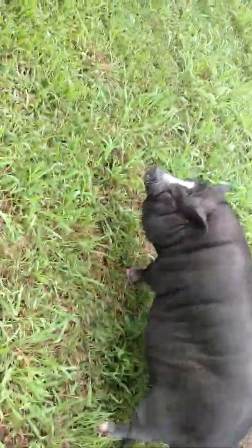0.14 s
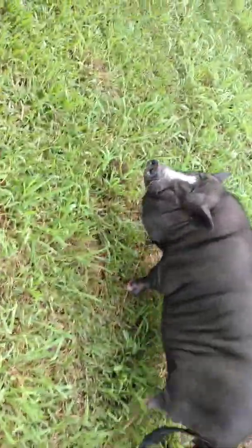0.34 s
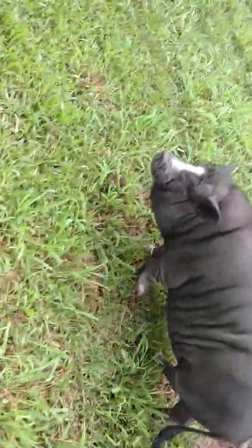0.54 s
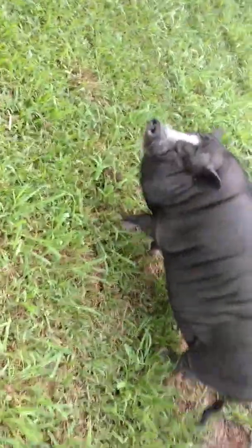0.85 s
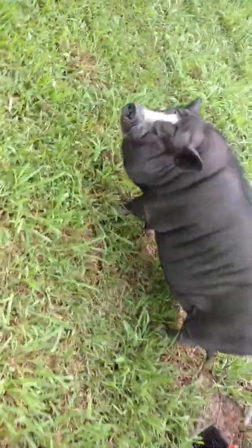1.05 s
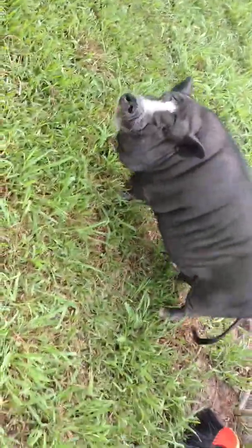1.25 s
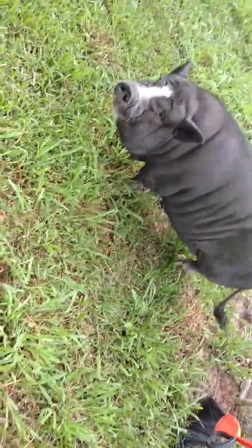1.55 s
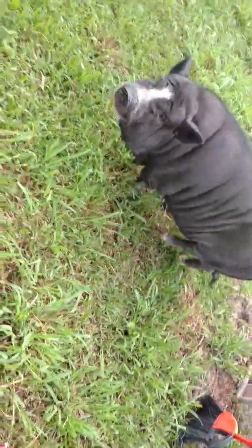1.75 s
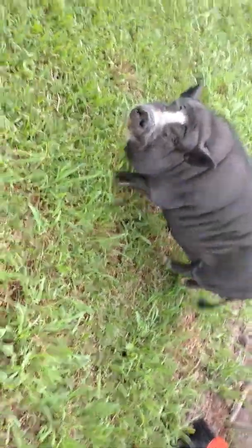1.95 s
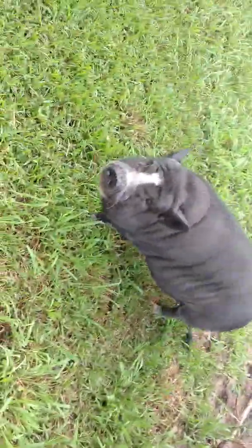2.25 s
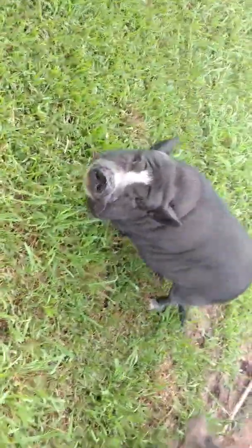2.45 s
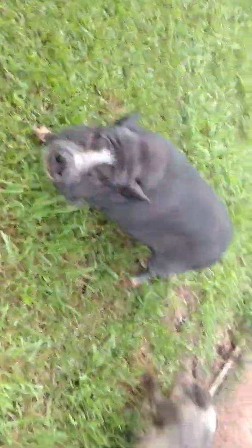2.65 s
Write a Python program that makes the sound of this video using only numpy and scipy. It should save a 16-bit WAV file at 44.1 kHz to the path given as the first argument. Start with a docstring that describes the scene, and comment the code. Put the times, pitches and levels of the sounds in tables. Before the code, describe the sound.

A pig grunts in short, low, throaty bursts on rustling grass, with insects buzzing faintly behind.

```python
"""Pigs grunt in short bursts in a grassy pen, close to a phone with two microphone ports.
Grunts are made of runs of slow vocal pulses that ring the throat and snout. One hoof stamps and settles,
ringing the soft soil. Grass rustles as dense grains of noise and stalks snap as short clicks.
Behind it all is a chorus of insects, made of throbbing bands of noise."""
import sys
import numpy as np
from scipy import signal
from scipy.fft import rfft, irfft
from scipy.io import wavfile
from scipy.ndimage import uniform_filter1d

SR = 44100
rng = np.random.default_rng(int(sys.argv[2]) if len(sys.argv) > 2 else 0)


def dump_mix(stems):
    """Bounce the given channels to the path in sys.argv[1] as a 16-bit WAV at rate SR."""
    frames = np.atleast_2d(stems).T  # one column per channel
    limited = np.clip(frames, -1, 1)  # hard clip at full scale
    pcm = np.round(limited * 32767).astype(np.int16)
    wavfile.write(sys.argv[1], SR, pcm)


def decibels_to_gain(level_db):
    """Convert a level in decibels to a linear amplitude gain (20 dB per decade)."""
    exponent = np.asarray(level_db, float) / 20
    return 10 ** exponent


N = 123479  # length in samples


def evened(x):
    """Scales a sound to an average (rms) level of 1."""
    return x / np.sqrt(np.mean(x ** 2) + 1e-20)


def read(points, hz):
    """Reads a curve of (Hz, value) points, with straight lines over log frequency."""
    f, value = np.transpose(points)
    return np.interp(np.log(hz + 1), np.log(f + 1), value)


def add(mix, s, sound):
    """Adds a two-port sound to the mix from second s on, cut at the end of the mix."""
    part = mix[:, round(s * SR):][:, :sound.shape[1]]
    part += sound[:, :part.shape[1]]


def resonate(x, hz, width):
    """A two-pole resonance of peak gain 1."""
    return signal.lfilter(*signal.iirpeak(min(hz, SR / 2.2), hz / width, SR), x)


def aside(x, pan_db, lag_ms):
    """Sends a low sound to both ports, the left one pan_db louder and lag_ms later."""
    n = np.arange(len(x))
    left = np.interp(n - lag_ms * SR / 1000, n, x)
    return np.array([decibels_to_gain(pan_db / 2) * left, decibels_to_gain(-pan_db / 2) * x])


def ports(x):
    """Two views of a diffuse sound made from two unrelated draws, alike by frequency."""
    # Each row: frequency in Hz, likeness of the two ports from 0 to 1.
    likeness = [(60, 0.19), (250, 0.26), (700, 0.81), (1600, 1), (2350, 1), (3400, 1), (4750, 0.98),
                (6000, 0.3), (8500, 0.17), (11000, 0.04), (15000, 0.1)]
    a, b = rfft(x)
    same = np.clip(read(likeness, np.fft.rfftfreq(N, 1 / SR)), 0, 1)
    left = same * a + np.sqrt(1 - same ** 2) * b
    return irfft([left, a], N)


def pigs():
    """All the grunts; each row is a run of pulses, or one pulse, and some grunts take two rows."""
    # Each row: throat shape, first pulse in seconds, length in seconds, pulses per second,
    # place of the strongest pulse from 0 to 1, effort of the first and of the last pulse in dB,
    # roughness from 0 to 1, level of the flap in dB, extra bite of the hardest pulse in dB,
    # level of the loudest 20 ms in dB (before panning), brightness in dB per octave,
    # chest level left over right in dB, chest lag of the left port in ms.
    grunts = [ ("open", .1545, .11, 37.9, .5, -4, -6, .06, -2, 3, -34.5, 5.9, 2, 0),
              ("open", .2865, .004, 38, .1, 0, 0, .1, -2, 0, -37, 7, 2, 0),
              ("open", .4805, .118, 53, .38, -7, -4, .17, -13, 1, -26, 0, 0, -0.21),
              ("deep", .6065, .135, 73, .1, -3, -11, .16, -12, 2.7, -27, 0, -5, 0.91),
              ("tight", 1.4945, .03, 84, .8, -3, -1, .12, -8, 7, -31, 0, -8, 0.055),
              ("tight", 1.531, .04, 172, .35, 0, -10, .12, -20, 0, -24, 0, -11, -0.54),
              ("wide", 1.9005, .088, 99, .55, -7, -12, .15, -10, 2.2, -24, 0, -2.9, 0.23),
              ("nasal", 2.0615, .004, 90, .3, 0, 0, .2, -12, 0, -35, 0, -4, .2),
              ("nasal", 2.0945, .068, 98, .53, -4, -18, .13, -10, 11, -26, 1.3, -2.2, 0.49),
              ("narrow", 2.2265, .004, 90, .1, 0, 0, .12, -16, 0, -34, 1, -1, 0.48),
              ("closed", 2.288, .075, 88, .4, -4, -4, .2, -8, 0, -40, 0, 0, 0),
              ("closed", 2.3685, .075, 86, .31, -6, -6, .1, -8, 6.6, -35.5, 0, 0, 0),
              ("narrow", 2.4565, .065, 97, .58, -7, -13, .1, -14, 1.7, -28.5, 0, -4, 0),
              ("nasal", 2.6195, .046, 93, .4, -5, -2, .12, -11, 10, -24, -1.5, -3.5, 0),
              ("nasal", 2.788, .012, 91, .9, -5, 0, .25, -8, 0, -37, -9, -1.9, 0)]
    out = np.zeros((2, N))
    for row in grunts:
        add(out, *grunt(*row))
    return out


def grunt(throat, start, length, rate, top, first_db, last_db, rough, flap_db, bite_db,
          db, tilt_db, pan_db, lag_ms):
    """Jittered pulses, each with a second flap and a puff of air, ring the throat."""
    # Each throat shape lists its resonances: frequency in Hz, width in Hz,
    # level in dB (before width scaling, the brightness tilt and the overall level).
    throats = { "open": [(224, 245, 0), (744, 234, 5.5), (1407, 216, -2), (1730, 190, -4.5),
               (3550, 260, -22)], "deep": [(202, 130, 5), (654, 210, -2.5), (1410, 220, -16),
               (1937, 230, 7.5), (2630, 210, -6), (3470, 200, -13.5), (5800, 360, -6.5)],
               "tight": [(170, 150, -2.5), (424, 37, -12.5), (826, 166, 0), (1074, 170, -1.5),
               (1990, 360, 1.5), (3270, 300, -27)], "wide": [(376, 184, -1.5), (176, 110, -1.5),
               (860, 420, -2.5), (1190, 110, -5.5), (1747, 230, 2), (2210, 550, -1.5), (3320, 290, -13.5)],
               "nasal": [(386.5, 140, 8.5), (170, 144, -3), (870, 200, 3), (1170, 290, 1), (1826, 290, -4)],
               "narrow": [(392, 184, -2), (193, 210, -13.5), (1092, 187, 1)], "closed": [(382, 340, 5.5),
               (195, 54, -0.5), (904, 110, -9), (1565, 580, 2), (3400, 550, -26)]}
    jitter, uneven_db = .015, .7  # of pulse times (a share) and of pulse effort
    flap_s, skirt = .0072, 1.7  # delay of the second flap; skirt sets how softly a ring starts
    chest_puff_s, puff_s = .014, .006  # how fast the air puffs die away
    rattle_hz = 33  # the slower the pulses, the more the chest rattles between them
    ring_up_s = .001  # time a ring takes to build
    chest_top_hz = 550
    harder = 2.3  # above the chest effort counts this many times, so hard pulses are brighter

    t, draw = np.arange(0, .25, 1 / SR), rng.standard_normal((40, 2))
    at = np.arange(40) / rate * (1 + jitter * draw[:, 0] / np.sqrt(np.arange(1, 41)))
    rough, air = np.clip(rough, 0, 1), rng.standard_normal(len(t))
    effort_db = np.interp(at / length, [0, np.clip(top, .05, .95), 1], [first_db, 0, last_db])
    effort_db = effort_db + uneven_db * draw[:, 1]
    hardest = np.arange(len(at)) == np.argmin(abs(at - top * length))
    sounding = at <= length
    parts = []
    for chest, push_db in ((True, effort_db), (False, harder * effort_db + bite_db * hardest)):
        clicks = np.zeros(len(t))
        clicks[np.round(at[sounding] * SR).astype(int)] = decibels_to_gain(push_db[sounding])
        clicks += decibels_to_gain(flap_db) * np.roll(clicks, round(flap_s * SR))
        fade = np.exp(-t[:3000] / (chest_puff_s if chest else puff_s))
        puffs = signal.oaconvolve(clicks, fade)[:len(t)] * air
        share = np.clip(rough + chest * (rattle_hz / rate) ** 2, 0, 1)  # air against clean clicks
        drive = np.sqrt(1 - share) * evened(clicks) + np.sqrt(share) * evened(puffs)
        part = 0
        for k, (f, w, level_db) in enumerate(throats[throat]):
            if (f < chest_top_hz) != chest:
                continue
            ring = resonate(drive * waver(len(t)), f, w)
            ring = resonate(resonate(ring, f, skirt * w), f, skirt * w)
            gain = decibels_to_gain(level_db + tilt_db * np.log2(f / 400)) / np.sqrt(w)
            part = part + (-1) ** k * gain * ring  # signs alternate down the list
        parts.append(part)
    chest_part, upper_part = parts
    loudest = np.sqrt(uniform_filter1d((chest_part + upper_part) ** 2, 900).max())
    sound = decibels_to_gain(db) / loudest * (aside(chest_part, pan_db, lag_ms) + upper_part)
    return start - ring_up_s, sound


def waver(size):
    """A gain that wanders from one pulse to the next, as soft tissue shifts."""
    wander = uniform_filter1d(uniform_filter1d(rng.standard_normal(size), 400), 400)
    return decibels_to_gain(1.4 * evened(wander))  # 1.4 dB rms


def stamp():
    """A hoof hits soft soil: short low modes, struck again as it settles."""
    # The hoof and its settling. Each row: start in seconds, peak in dB (before panning).
    hits = [(1.2527, -8.5), (1.282, -22.5), (1.301, -27.5)]
    # Ways the soil rings. Each row: frequency in Hz (before a random shift at each hit),
    # level in dB (before the low cut and the hit's level), time to fall by 60 dB in seconds.
    soil = [(213, 2, 0.051), (312, 4.5, 0.026), (427, 4.5, 0.023), (539, -2.5, 0.034), (615, -9, 0.084),
            (815, -9, 0.046), (3400, -25, 0.027)]
    low_cut_hz, rise_s = 208, 0.001
    pan_db, lag_ms = -9, .8

    out, t = np.zeros((2, N)), np.arange(6000) / SR
    for s, db in hits:
        ring = np.zeros(len(t))
        for f, level_db, t60 in soil:
            tone = np.sin(2 * np.pi * f * rng.uniform(0.91, 1.02) * t)
            ring -= decibels_to_gain(level_db - 60 * t / t60) * tone
        ring = ring * (1 - np.exp(-t / rise_s))
        ring = signal.lfilter(*signal.butter(4, low_cut_hz, "high", fs=SR), ring)
        add(out, s, aside(decibels_to_gain(db) * ring / abs(ring).max(), pan_db, lag_ms))
    return out


def grass():
    """Dense grains of uneven size, coloured three ways, each on its own level."""
    # Each row: time in seconds, level of the dry treble in dB, of the rustle in dB,
    # of the low shuffle in dB; levels glide from row to row.
    moves = [(0.0, -45.5, -47, -45), (0.14, -41.5, -45, -45), (0.23, -45.5, -37, -43),
             (0.39, -48, -54, -54.5), (0.51, -42.5, -45, -45), (0.58, -62, -55, -35),
             (0.61, -64, -46.5, -34), (0.79, -47, -49, -48.5), (0.85, -48, -47, -43.5),
             (0.99, -45, -47, -43.5), (1.04, -52.5, -55.5, -46), (1.19, -46, -48.5, -45.5),
             (1.22, -40, -35, -36), (1.252, -47, -33, -38.5), (1.32, -52, -51, -42), (1.46, -41, -47, -48),
             (1.491, -57, -49, -47.5), (1.53, -37, -33, -32), (1.57, -40, -40, -43),
             (1.82, -46, -48.5, -50), (1.85, -37, -44, -49), (1.91, -42.5, -46.5, -41.5),
             (1.96, -57, -39, -32), (1.99, -41.5, -44.5, -45.5), (2.06, -48.5, -50.5, -45.5),
             (2.17, -44, -46.5, -43.5), (2.36, -53, -51.5, -44.5), (2.43, -38, -44.5, -41.5),
             (2.5, -49, -51.5, -46), (2.6, -42.5, -49, -47), (2.8, -59, -57, -50)]
    # Colour of the low shuffle. Each row: frequency in Hz, relative level in dB.
    shuffle = [(40, -8), (80, 5.5), (200, 4), (450, 2), (900, -2), (1500, -8.5), (2200, -16.5), (4000, -18)]
    # Colour of the rustle. Each row: frequency in Hz, relative level in dB.
    rustle = [(300, 0), (1200, -4.5), (2000, 0), (3500, -1.5), (5500, -3), (8000, -14), (12000, -106)]
    # Colour of the dry treble. Each row: frequency in Hz, relative level in dB.
    dry_treble = [(3000, -21), (6000, 9), (9000, 5), (12000, 4.5), (15500, 1.5)]
    grains_per_s, grain_spread_db = 5000, 0.5

    s, *levels = np.transpose(moves)
    hz, out = np.fft.rfftfreq(N, 1 / SR), 0
    for colour, db in zip((dry_treble, rustle, shuffle), levels):
        size = decibels_to_gain(grain_spread_db * np.minimum(rng.exponential(1, N), 5))
        size = size * (rng.random(N) < grains_per_s / SR)
        # a steady floor of noise plus grains 12 samples long
        grains = (0.21 + uniform_filter1d(size, 12) * 3.8) * rng.standard_normal((2, N))
        coloured = evened(irfft(rfft(grains) * decibels_to_gain(read(colour, hz)), N))
        out = out + decibels_to_gain(np.interp(np.arange(N) / SR, s, db)) * coloured
    return ports(out)


def snaps():
    """Each snapping stalk gives one broad click of about a millisecond."""
    # Each row: start in seconds, peak in dB, centre frequency in Hz.
    stalks = [(.2072, -24, 3600), (.8255, -22, 11500), (.8404, -26, 11000), (.8592, -23, 6000),
              (1.446, -29, 11000), (1.505, -22, 12000), (1.5272, -15, 9000), (1.6268, -22, 5000),
              (2.3277, -27, 11000), (2.4, -22, 7000), (2.5514, -23, 4500)]
    out, t = np.zeros((2, N)), np.arange(400) / SR
    for s, db, hz in stalks:
        burst = np.exp(-t / .0008) * rng.standard_normal(len(t))
        click = resonate(burst, hz, hz / 1.5)  # a low Q of 1.5 keeps it broad
        add(out, s, np.ones((2, 1)) * decibels_to_gain(db) * click / abs(click).max())
    return out


def insects():
    """Bands of fast scraping that throb with the wing beat and swell slowly."""
    # Each row: centre in Hz, width of the first resonance in Hz, level in dB,
    # throbs per second, throb depth from 0 to 1.
    singers = [(8610, 630, -43.5, 60.4, 0.21), (6180, 740, -49, 55, 0.21)]
    out, t = 0, np.arange(N) / SR
    for hz, width, db, rate, depth in singers:
        drift = evened(uniform_filter1d(uniform_filter1d(rng.standard_normal(N), 6000), 6000))
        swell = evened(uniform_filter1d(rng.standard_normal(N), 900))
        throb = 1 + depth * np.cos(2 * np.pi * rate * t + 0.5 * drift)
        throb = throb * decibels_to_gain(1.0 * swell + 0.69 * drift)  # both in dB
        band = resonate(resonate(rng.standard_normal((2, N)), hz, width), hz, 1.7 * width)
        out = out + decibels_to_gain(db) * evened(throb * band)
    return ports(out)


def scene():
    """Sounds add up in the air, so the sources are simply summed."""
    return pigs() + stamp() + grass() + snaps() + insects()


def top_cut(x):
    """Nothing passes above the cut-off."""
    return signal.sosfilt(signal.butter(12, 15910, fs=SR, output="sos"), x)


def record(dry):
    """The left port hears the treble later and mostly weaker; the bass and the top edge are cut."""
    # Each row: frequency in Hz, level of the left port in dB.
    left_level = [(100, -2), (2300, 0.5), (4700, -1), (6000, -4), (8600, -5.5), (11000, -3.5),
                  (15000, -8.5)]
    lag_s, lag_from_hz = 0.000411, 1067  # the left port lags above this frequency
    steps, steps_end_hz = 0.043, 6500  # lag grows in steps of half a turn, smoothing out near here
    low_cut_hz, edge_hz = 50.5, 15900

    hz = np.fft.rfftfreq(N, 1 / SR)
    turn = 2 * np.pi * lag_s * np.maximum(hz - lag_from_hz, 0)  # phase in radians
    turn -= steps * np.sin(2 * turn) / (1 + (hz / steps_end_hz) ** 8)
    left = decibels_to_gain(read(left_level, hz)) * np.exp(-1j * turn)
    band = (hz < edge_hz) * hz ** 4 / np.sqrt(hz ** 8 + low_cut_hz ** 8)
    mix = irfft(rfft(dry) * band * [left, np.ones(len(hz))], N)
    return top_cut(mix)


dry = scene()
out = record(dry)
dump_mix(out)
```